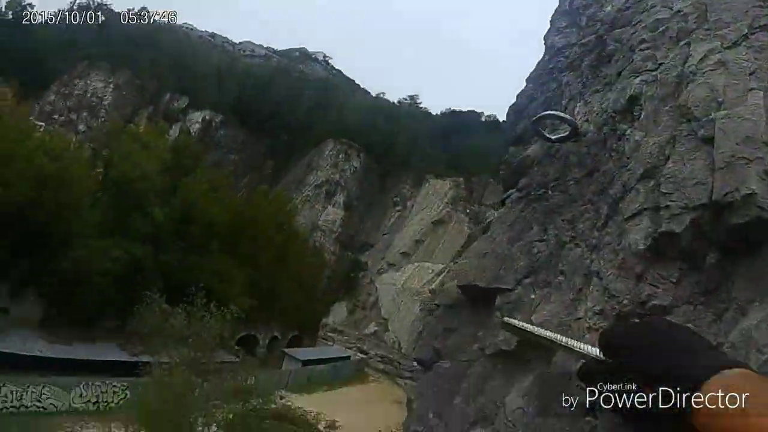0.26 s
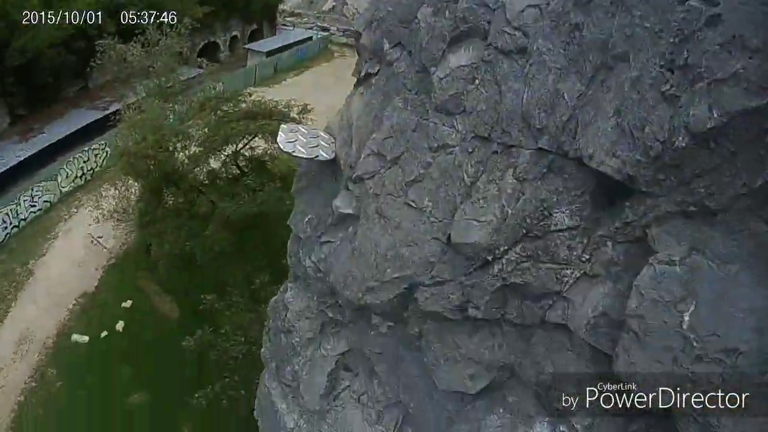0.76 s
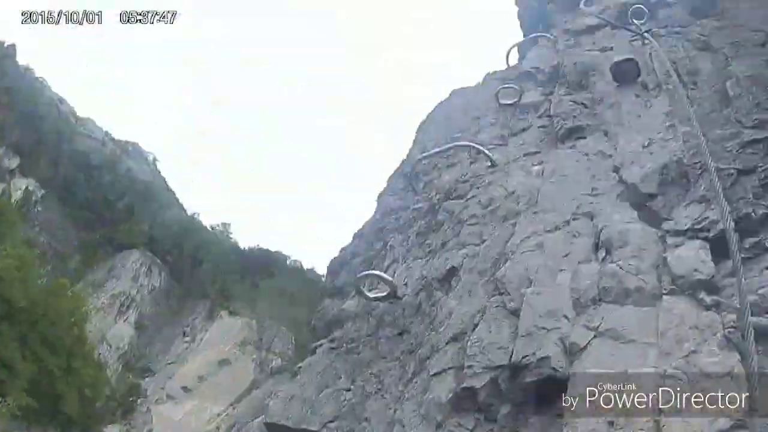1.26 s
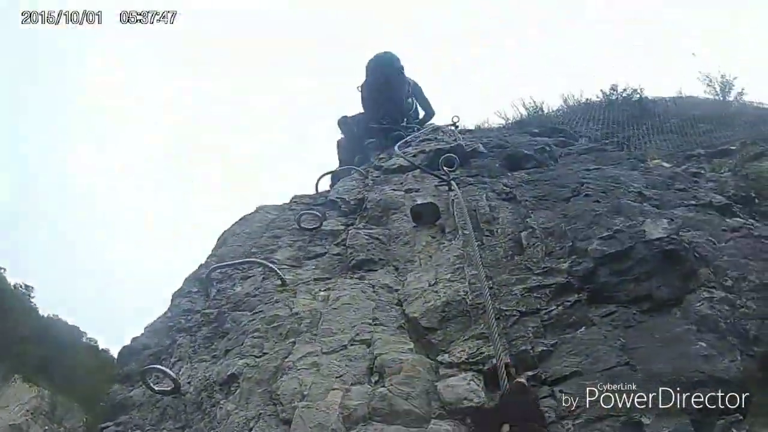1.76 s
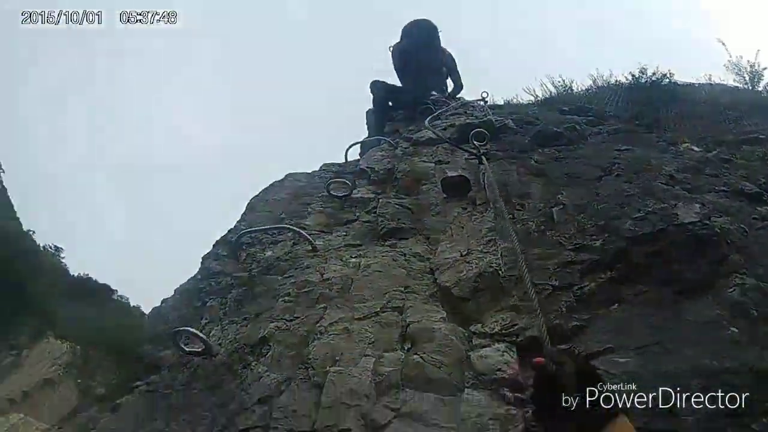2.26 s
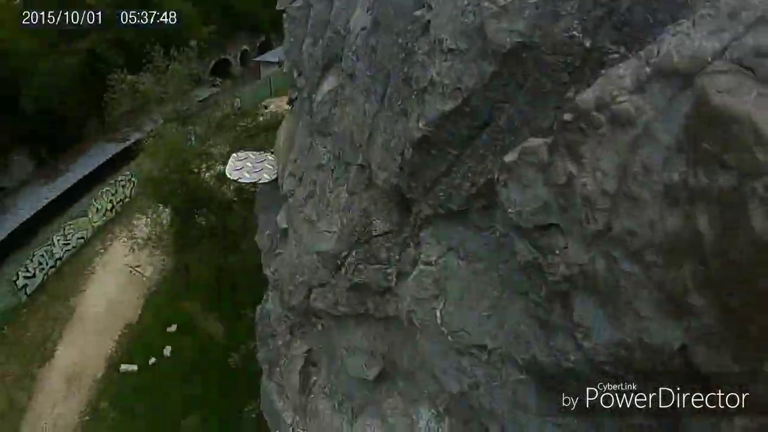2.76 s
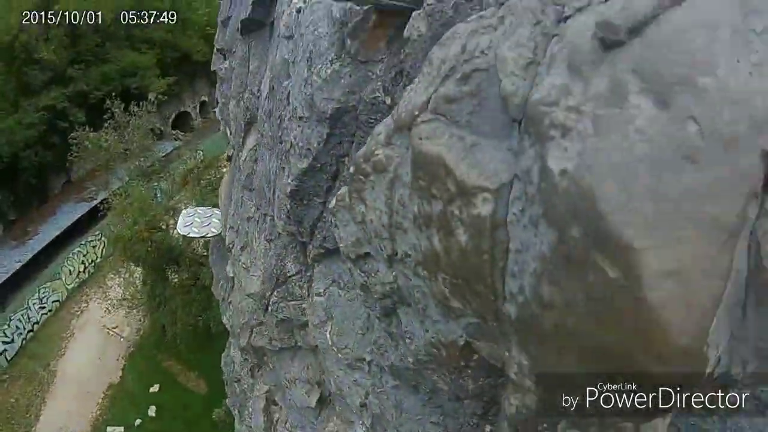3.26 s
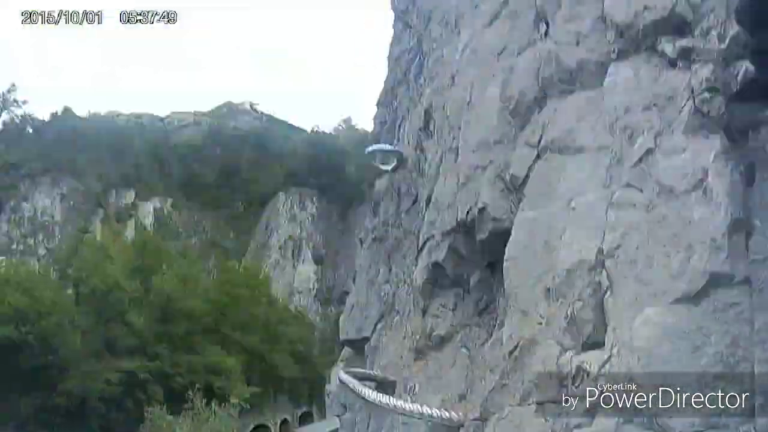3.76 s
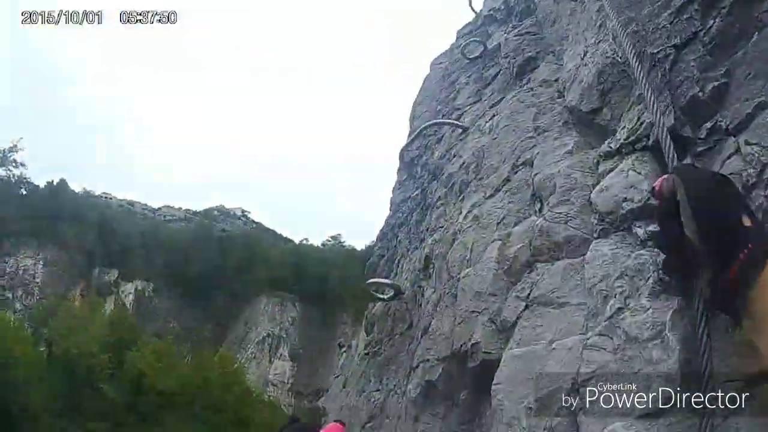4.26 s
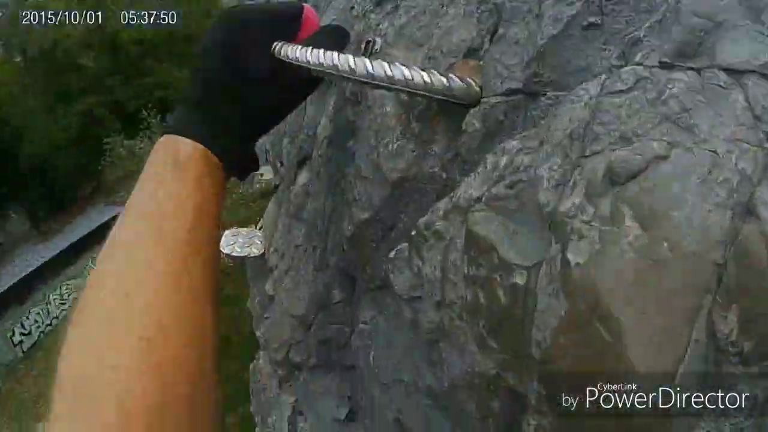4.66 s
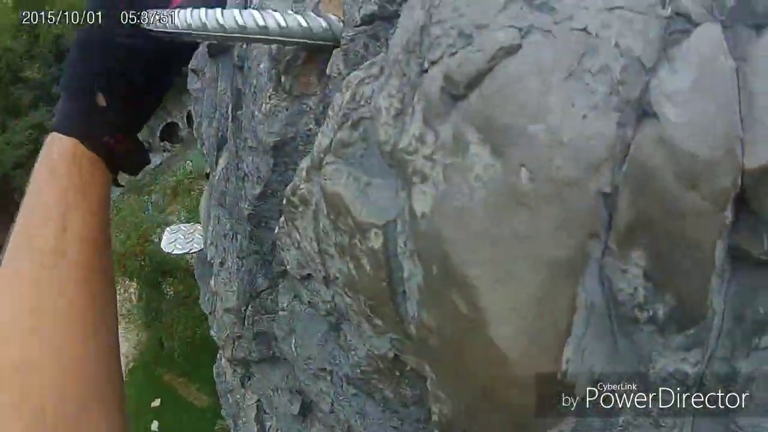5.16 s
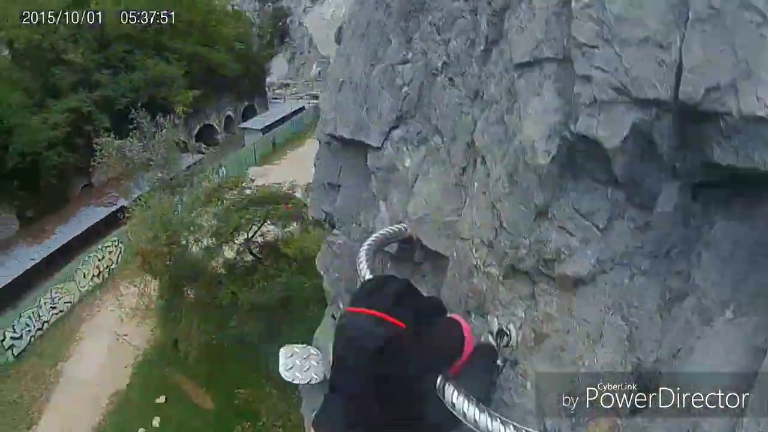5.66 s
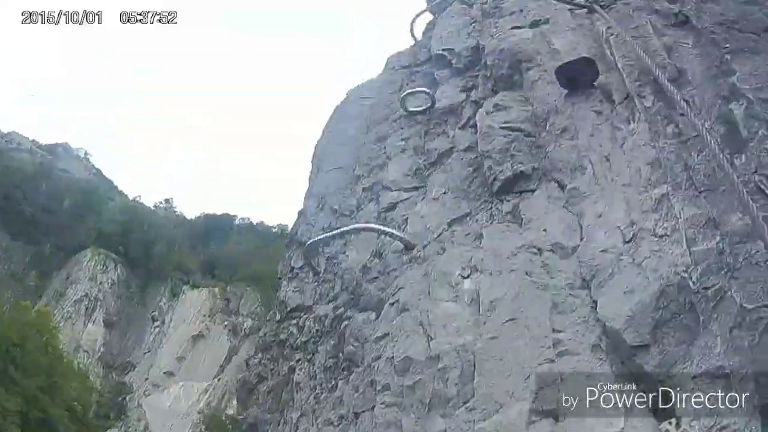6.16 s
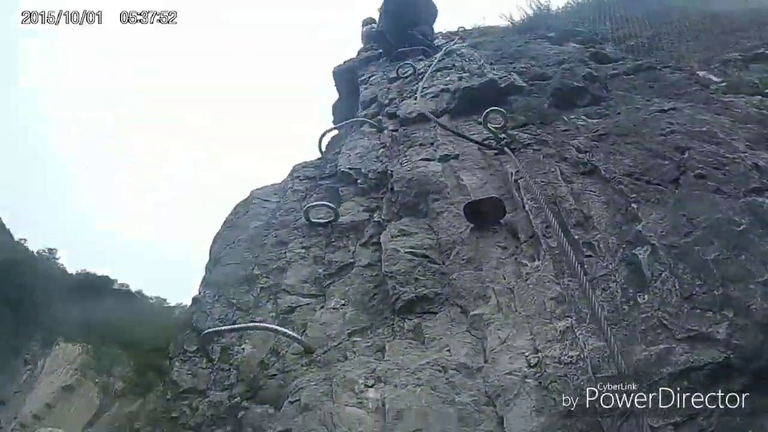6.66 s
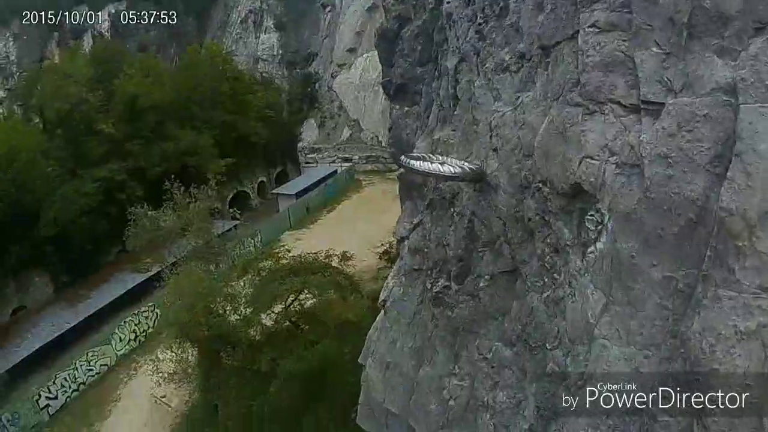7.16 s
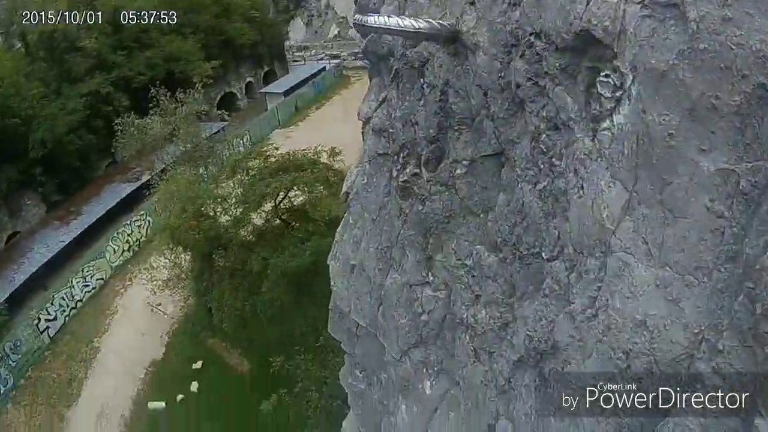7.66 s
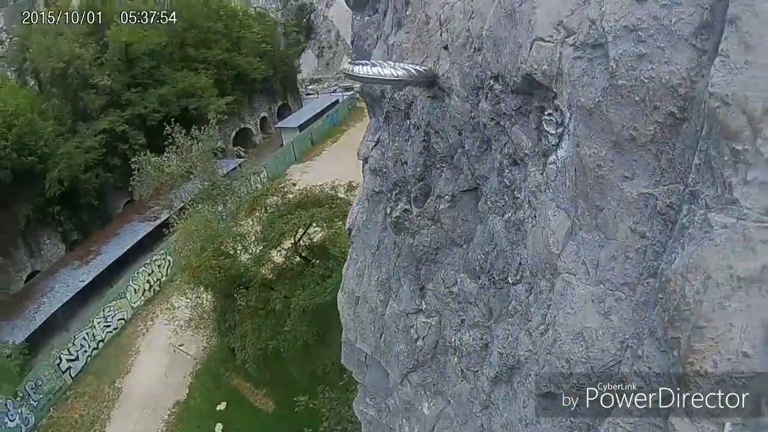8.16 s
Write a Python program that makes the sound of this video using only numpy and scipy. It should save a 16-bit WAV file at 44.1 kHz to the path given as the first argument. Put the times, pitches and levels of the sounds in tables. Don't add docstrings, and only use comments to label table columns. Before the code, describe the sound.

A climber on a cliff with iron rungs, heard by a head-worn microphone inside a sealed shell. Light padded ticks and small metal clinks open the scene over very quiet, steady valley wash and electronic hiss. Soft air pops lead to a gritty rock bump at 1.15 s; straps rub, and the mount snaps hard at 1.6, followed by a clink at 1.75. A firm dull knock lands at 2.2, with faint cricket rasps around 1.9-2.6. The heaviest bump crunches at 3.05, a clink rings at 3.7, then a strap scrape and bright ping precede the hardest snap at 4.2. Knocks follow at 4.4 and 4.7, another bump at 4.97. From 5.5 to 6 low pops cluster with a dull puff and clinking; mount rattles continue. A softer snap at 6.5, sparse knocks, pops near 7.45, faint cricket again, and last ticks around 8.1-8.2.

```python
import sys
import numpy as np
from scipy import signal
from scipy.fft import rfft, irfft, next_fast_len
from scipy.io import wavfile

SR = 44100
rng = np.random.default_rng(int(sys.argv[2]) if len(sys.argv) > 2 else 0)


def unload_audio(sound):
    columns = np.transpose(np.atleast_2d(sound))
    steps = np.round(np.clip(columns, -1, 1) * 32767)
    wavfile.write(sys.argv[1], SR, steps.astype(np.int16))


def gain_from_db(level_db):
    decades = np.asarray(level_db, float) / 20
    return 10 ** decades


N = 371763


def rms_one(x):
    return x / np.sqrt(np.mean(x ** 2) + 1e-30)


def band(x, low_hz, high_hz):
    return signal.sosfilt(signal.butter(2, [low_hz, high_hz], "band", fs=SR, output="sos"), x)


def ring(force, hz, t60_s):
    radius = gain_from_db(-60 / (t60_s * SR))
    angle = 2 * np.pi * hz / SR
    return signal.lfilter([0, np.sin(angle)], [1, -2 * radius * np.cos(angle), radius ** 2], force + 1e-18)


def drift(rate_hz):
    r = np.exp(-2 * np.pi * rate_hz / SR)
    wander = signal.lfilter([1], [1, -2 * r, r * r], rng.standard_normal(N + SR))
    return rms_one(wander[SR:])


def grains(per_s, spread_db):
    sizes = gain_from_db(spread_db * np.minimum(rng.exponential(1, N), 4))
    signs = rng.choice([-1, 1], N)
    return sizes * signs * (rng.random(N) < per_s / SR)


def add(out, start_s, sound):
    i = round(start_s * SR)
    out[i:i + len(sound)] += sound[:N - i]


# (frequency [Hz], density [dB per Hz])
WASH_SPECTRUM = [(12, -30), (20, 1.5), (44, -8.5), (92, -5), (202, -3.5), (274, -3.5), (881, -5),
                 (1270, -7), (1450, -7.5), (4310, -18.5), (5850, -25.5), (8640, -40), (10200, -40.5),
                 (13500, -30.5), (15500, -28.5)]


def valley():
    level_db = -63.5 + 1.0
    size = next_fast_len(N)
    hz = np.fft.rfftfreq(size, 1 / SR) + 1
    points = np.array(WASH_SPECTRUM)
    colour = gain_from_db(np.interp(np.log(hz), np.log(points[:, 0]), points[:, 1]))
    wash = irfft(rfft(rng.standard_normal(size)) * colour, size)[:N]
    return gain_from_db(level_db) * rms_one(wash)


# (time [s], level [dB rms])
RASPS = [
    (1.922, -88),
    (2.119, -89),
    (2.585, -89),
    (6.796, -89),
    (7.063, -90),
    (7.435, -89),
    (7.718, -89),
    (8.07, -89),
]


def cricket():
    t = np.arange(N) / SR
    swell = np.zeros(N)
    for s, level_db in RASPS:
        swell += gain_from_db(level_db) * np.exp(-((t - s) / 0.027) ** 4)
    return swell * rms_one(band(rng.standard_normal(N), 10600, 12300))


# (time [s], level [dB])
EFFORT = [(0, -62), (.56, -68), (.98, -63.5), (1.29, -73.5), (1.66, -60), (1.9, -64.5), (2.6, -77),
          (3.0, -58.5), (3.4, -80), (4.04, -69), (4.19, -56), (4.6, -76), (4.95, -60), (5.6, -80),
          (6.0, -65.5), (7.0, -70.5), (7.3, -61.5), (8.43, -84)]
# (frequency [Hz], width [Hz], level [dB])
STRAP_MODES = [(530, 560, -16), (1168, 143, -1), (1299, 61, 0.5), (1653, 160, -3), (1856, 78, -5.5),
               (2140, 160, -8.5), (2510, 190, -11.5), (3180, 110, -19.5), (4340, 510, -23)]
# (start [s], length [s], strap [dB], mount [dB])
SLIDES = [(1.404, 0.094, -56, -65), (1.521, 0.15, -60, -61.5), (1.647, 0.043, -63, -57.5),
          (1.695, 0.071, -51, -60), (2.732, 0.068, -51.5, -57.5), (2.812, .09, -62.5, -64),
          (2.97, 0.056, -68, -64), (4.094, 0.027, -42.5, -53), (4.12, .04, -40.5, -42.5),
          (4.772, 0.061, -61, -62), (5.892, 0.048, -50, -45.5), (6.354, 0.1, -56.5, -59.5)]
# (start [s], length [s], mount [dB])
MOUNT_SHAKES = [(.23, 0.13, -68), (.65, .04, -64), (4.271, 0.03, -59.5), (5.02, 0.034, -64),
                (5.101, 0.038, -53), (5.146, 0.077, -49), (6.029, 0.031, -48), (6.096, 0.087, -52.5),
                (6.155, 0.034, -47), (7.169, 0.049, -59), (7.365, .03, -62), (7.54, 0.22, -68.5)]
# (start [s], length [s], mount [dB], air [dB])
HEAD_JOLTS = [(.565, .045, -68, -62), (0.771, 0.022, -61, -45), (0.853, 0.035, -63, -51),
              (.98, 0.097, -71.5, -67), (1.117, 0.078, -50.5, -45), (1.635, 0.044, -67.5, -55),
              (3.032, 0.048, -46, -41), (3.102, 0.062, -51, -53), (4.207, 0.059, -49.5, -40),
              (4.934, 0.067, -46.5, -40.5), (5.486, 0.08, -57, -61), (5.829, 0.07, -70, -46),
              (5.945, 0.056, -71, -44), (6.488, 0.065, -61, -47), (7.427, 0.11, -66, -48.5)]


def rubbing():
    sway_mean_db = -68.5
    mount_rest_db, mount_follows = -69.5, 0.8
    air_rest_db, air_follows = -72.5, 0.36
    slide_air_db = -7.5
    shake_strap_db, shake_air_db = -17.5, -16
    jolt_strap_db = -13.5
    t = np.arange(N) / SR
    s, sway_db = np.transpose(EFFORT)
    effort_db = np.interp(t, s, sway_db) - sway_mean_db
    rest_db = np.array([sway_mean_db + effort_db,
                        mount_rest_db + mount_follows * effort_db,
                        air_rest_db + air_follows * effort_db])
    gains = gain_from_db(rest_db - 3.5)

    strokes = [(*row, row[-1] + slide_air_db) for row in SLIDES]
    strokes += [(s, length, db + shake_strap_db, db, db + shake_air_db) for s, length, db in MOUNT_SHAKES]
    strokes += [(s, length, db + jolt_strap_db, db, air_db) for s, length, db, air_db in HEAD_JOLTS]
    for start, length, strap_db, mount_db, air_db in strokes:
        near = slice(int((start - length / 2) * SR), int((start + 1.5 * length) * SR))
        pressure = np.exp(-(2 * (t[near] - start) / length - 1) ** 4)
        gains[:, near] += gain_from_db(np.array([[strap_db], [mount_db], [air_db - 4.5]])) * pressure

    slips = grains(per_s=1600, spread_db=3) * gain_from_db(3 * drift(60))
    strap = np.zeros(N)
    for k, (hz, width_hz, db) in enumerate(STRAP_MODES):
        strap += (-1) ** k * gain_from_db(db) * np.sqrt(width_hz) * ring(slips, hz, 1.6 / width_hz)
    shakes = band(grains(per_s=400, spread_db=2.5), 150, 700)
    mount = ring(shakes, 202.8, 0.098)
    mount -= gain_from_db(-5.0) * ring(shakes, 345, 0.038)
    mount += gain_from_db(-12.5) * ring(shakes, 543, 0.043)
    air = band(rng.standard_normal(N) * gain_from_db(3 * drift(15)), 20, 75)
    return gains[0] * rms_one(strap) + gains[1] * rms_one(mount) + gains[2] * rms_one(air)


# (crest time [s], crest [dB], width [ms])
SQUEEZES = [(0.7917, -36, 1.6), (0.9883, -47, 2.1), (1.1435, -29, 0.91), (1.1461, -26, 1.1),
            (3.0213, -31, 2.5), (3.1549, -27, 1.4), (4.9324, -37, 2.5), (5.519, -32.5, 18),
            (5.564, -25.5, 0.44), (5.5651, -23, 2.9), (5.8917, -25, 5.6), (5.9252, -33, 2.2),
            (5.9337, -21.5, 2.1), (6.4746, -22.5, 1), (6.4791, -28, 0.32), (6.483, -33, 1.1),
            (7.4519, -30.5, 0.59), (7.4627, -30.5, 0.68)]
# (crest time [s], crest [dB], width [ms])
DRAWS = [(0.5805, -46, 7.4), (0.8643, -38.5, 2.5), (1.053, -42, 2.5), (1.145, -30.5, 0.71),
         (1.6078, -30.5, 0.9), (3.148, -31.5, 0.97), (4.232, -40, 2.5), (4.9464, -37, 3.7),
         (5.5089, -35.5, 1.1), (5.5357, -37.7, 12), (5.5696, -25, 0.94), (5.575, -30.5, 2.3),
         (5.8267, -43.5, 4.8), (5.8692, -35, 1.15), (5.8849, -23.5, 2.1), (5.9, -36, 4), (5.929, -28.5, 3),
         (5.9325, -23.5, 0.82), (5.9561, -36, 7.3), (6.4592, -38, 2.1), (7.4707, -27.5, 0.52),
         (7.511, -35.5, 8.7)]
# (lag [s], level re bump [dB], width [ms], push +1 or pull -1 [sign])
BUMP_PRESSURE = [
    (-.011, -9, 18, 1),
    (-.0022, -2, 2.1, -1),
    (.0035, -2.5, .8, -1),
    (.011, -21, 16, 1),
]


def pops():
    settle_s, settle_db, settle_ms = 0.0356, -28.5, 14
    out = np.zeros(N)
    crests = [(*row, 1) for row in SQUEEZES] + [(*row, -1) for row in DRAWS]
    crests += [(*row[:-1], -1) for row in ROCK_BUMPS]
    crests += [(s + lag_s, db + rel_db, ms, way)
               for s, db, *_ in ROCK_BUMPS for lag_s, rel_db, ms, way in BUMP_PRESSURE]
    crests += [(s + settle_s, db + settle_db, settle_ms, 1) for s, db, *_ in MOUNT_SNAPS]
    for s, crest_db, width_ms, way in crests:
        t = np.arange(-3 * width_ms, 6 * width_ms, 1000 / SR) / width_ms
        squeeze = np.exp(-(t / 0.45) ** 2)
        let_go = np.exp(-(np.abs(t) / 0.7) ** 1.5)
        shape = np.where(t < 0, squeeze, let_go)
        add(out, s - 3 * width_ms / 1000, np.sign(way) * gain_from_db(crest_db) * shape)
    return signal.sosfilt(signal.butter(1, 25, "high", fs=SR, output="sos"), out)


# (time [s], pull crest [dB], width [ms], crunch [dB rms])
ROCK_BUMPS = [
    (1.1548, -25, 2.4, -31),
    (3.0495, -22.5, 2.1, -29),
    (4.9732, -23.5, 2, -31.5),
]
# (lag [s], level re crunch [dB], length [s], knee [Hz], fall [dB per octave])
ROCK_GRIT = [
    (-.009, -18, .011, 4200, -25),
    (-.0026, 0, .0022, 4200, -25),
]
# (lag [s], level [dB], length [s], knee [Hz], fall [dB per octave])
SNAP_GRIT = (.028, -49, .019, 4900, -38)
# (time [s], level [dB rms], length [s], knee [Hz], fall [dB per octave])
CLOTH_PUFFS = [
    (4.191, -58, .006, 4500, -40),
    (5.5715, -41, 0.0074, 1300, -18),
    (7.478, -47, 0.017, 1000, -13.5),
    (7.503, -51.5, .016, 4500, -39),
]


def crunches():
    snap_follows = 0.22
    size = 4096
    out = np.zeros(N)
    hz = np.fft.rfftfreq(size, 1 / SR) + 1
    after_s, grit_db, *kind = SNAP_GRIT
    swells = [tuple(row) for row in CLOTH_PUFFS]
    swells += [(s + after_s, snap_follows * db + grit_db, *kind) for s, db, *_ in MOUNT_SNAPS]
    swells += [(s + lag_s, db + rel_db, *rest)
               for s, *_, db in ROCK_BUMPS for lag_s, rel_db, *rest in ROCK_GRIT]
    for s, level_db, length_s, knee_hz, fall_db in sorted(swells):
        slope_db = fall_db * np.log2(np.maximum(hz / knee_hz, 1)) - 3.46 * np.log2(hz / 1000)
        colour = gain_from_db(slope_db) * (hz > 500) * (hz < 12000)
        grit = rms_one(irfft(rfft(rng.standard_normal(size)) * colour))
        swell = np.exp(-((np.arange(size) - size // 2) / SR / length_s * 2) ** 2)
        add(out, s - size // 2 / SR, gain_from_db(level_db) * grit * swell)
    return out


# (time [s], crest [dB], rise [ms], fall [ms], bounce lag [ms])
MOUNT_SNAPS = [
    (1.6173, -8, 0.2, 0.57, 2.3),
    (4.2184, -6, 0.14, 0.49, 1.82),
    (6.4757, -15, 0.13, 0.55, 2.14),
]


def snaps():
    cut_hz, bounce_gain, draw_gain = 3300, 0.13, 0.12
    out = np.zeros(N)
    ms = np.arange(-6, 30, 1000 / SR)
    for s, crest_db, rise_ms, fall_ms, bounce_ms in MOUNT_SNAPS:
        spike = np.exp(-np.abs(ms / np.where(ms < 0, rise_ms, fall_ms)) ** 1.5)
        draw = -draw_gain * np.exp(-((ms + 1.2) / np.where(ms < -1.2, 1.6, 0.5)) ** 2)
        overshoot = -0.3 * np.exp(-((ms - 0.6 * bounce_ms) / (0.4 * bounce_ms)) ** 2)
        bounce = np.roll(spike, round(bounce_ms * SR / 1000))
        rattle = gain_from_db(-49.5) * ring(bounce, 900, 0.023) + gain_from_db(-43) * ring(bounce, 1300, 0.0091)
        snap = spike + draw + overshoot + bounce_gain * bounce + rattle
        add(out, s - 6 / 1000, gain_from_db(crest_db) * snap)
    return signal.sosfilt(signal.butter(2, cut_hz, fs=SR, output="sos"), out)


# (frequency [Hz], t60 [s], contact [s])
SHELL_MODES = [(1667, 0.045, .004), (206.5, 0.067, 0.0027), (1300, 0.052, 0.0044), (2335, 0.029, 0.003),
               (3410, 0.015, 0.003), (4150, 0.012, 0.0013), (1000, 0.09, 0.011), (578, 0.015, 0.01),
               (2050, 0.037, 0.0027), (1728, 0.04, 0.0038), (353, 0.059, 0.0033)]
# (time [s], 1.6 kHz mode [dB], mount re that [dB], 1.3 kHz re that [dB])
PADDED_KNOCKS = [(0.0804, -47, -1, -10), (0.186, -70, 17.5, -4), (0.2334, -73, 17, -5),
                 (0.5715, -67, 19, -6), (0.782, -53.5, 0, 1), (1.3038, -70.5, 14, -10),
                 (2.2369, -27, -12, -9), (2.8081, -41, -6, -6), (3.4454, -66.5, 6.5, 3),
                 (3.7686, -48.5, 2.5, 0.5), (4.1677, -51, 3.5, -2), (4.4427, -36.5, -15, -15),
                 (4.7189, -36, -9.5, -9.5), (4.8456, -47.5, -1.5, -1.5), (5.1711, -49.5, 5.5, -0.5),
                 (5.3537, -60, 11.5, 5), (5.481, -51.5, 4, -1.5), (5.9039, -38.5, -9, -17),
                 (5.9791, -49.5, 3, -2), (6.07, -55.5, 0, 3), (6.1636, -50.5, 3.5, 5.5),
                 (6.1743, -46, -22, -16), (6.3883, -41, -2.5, -16), (6.439, -47, -1.5, -2),
                 (6.694, -60.5, 12.5, -12), (7.23, -38.5, -11.5, -5), (8.1199, -42, -4, 0.5)]
# (time [s], 1.6 kHz mode [dB], mount re that [dB], 1.3 kHz re that [dB], 2.4 kHz re that [dB])
METAL_CLINKS = [(0.31, -63.5, 5, 4, 1), (0.5372, -58.5, -4, 8.5, -8), (0.718, -58.5, -6, 5, -10),
                (1.0039, -62, -7, 9.5, -9), (1.3636, -53.5, -19, 0, -7), (1.4153, -52.5, -22, -16, -10),
                (1.4619, -52.5, -4, 0, -12), (1.7424, -34, -9, -9, -16), (2.016, -46.5, -10.5, -5.5, -8.5),
                (2.36, -55, -7, 0, -3), (2.8705, -51.5, -12, 1, -12), (3.6978, -35.5, -11.5, -5.5, -9),
                (4.0802, -47, -3, 3, -12), (5.912, -36, -10, -2.5, -3), (6.7084, -47, -29, -6, -6.5),
                (6.894, -49.5, -24, 2.5, -11), (8.2097, -38.5, -21, -4.5, -2)]
# (time [s], 1.6 kHz mode [dB], bright edge re that [dB])
RIM_PINGS = [
    (2.712, -67.5, 5),
    (4.087, -42.5, 1.5),
    (4.794, -56.5, 0),
    (7.0772, -66, 4.5),
    (7.743, -74, 13),
]
TOP_MODE_TILT = {"knock": 2, "clink": -6, "ping": 0}


def ticks():
    knock_mid_db, knock_edge_db = -27.5, -29
    clink_edge_re_mid_db = -10
    ping_mount_db, ping_low_db, ping_mid_db = -13, -2, -1
    chatter_span = 2.07
    first_touch = 12.1
    free_s, damp_s, damp_db, damped_above_hz = 0.0042, 0.0009, -9, 1200
    held_db_per_s, press_s = -900, 0.0014
    out = np.zeros(N)
    t = np.arange(SR // 8) / SR
    touches = [(*row, knock_mid_db, knock_edge_db, "knock") for row in PADDED_KNOCKS]
    touches += [(*row, row[-1] + clink_edge_re_mid_db, "clink") for row in METAL_CLINKS]
    touches += [(s, db, ping_mount_db, ping_low_db, ping_mid_db, edge_db, "ping")
                for s, db, edge_db in RIM_PINGS]
    for s, level_db, mount_db, low_db, mid_db, edge_db, kind in sorted(touches):
        chatter = rng.standard_normal((len(SHELL_MODES), len(t)))
        detune = rng.normal(0, 0.012, len(SHELL_MODES))
        shares_db = [0, mount_db, low_db, mid_db, edge_db - 0.5, edge_db + TOP_MODE_TILT[kind],
                     low_db - 14, mount_db - 9.5, mid_db - 6, -6, mount_db - 10]
        for (hz, t60_s, contact_s), share_db, force, off in zip(SHELL_MODES, shares_db, chatter, detune):
            force[0] = first_touch
            drive = band(force * (t < contact_s), hz / chatter_span, hz * chatter_span)
            sound = ring(drive, hz * (1 + off), t60_s)
            if hz > damped_above_hz:
                settling_db = damp_db * np.clip((t - free_s) / damp_s, 0, 1)
                sound *= gain_from_db(settling_db + held_db_per_s * np.maximum(t - free_s, 0))
            sound *= np.sqrt(np.minimum(t / press_s, 1))
            add(out, s - 0.0006, gain_from_db(level_db + share_db + 5) * sound / np.abs(sound).max())
    return out


def scene():
    shell_cut_hz = 6100
    contact = rubbing() + pops() + snaps() + ticks()
    contact = signal.sosfilt(signal.butter(6, shell_cut_hz, fs=SR, output="sos"), contact)
    return (valley() + cricket() + crunches() + contact)[None]


def roll_off(x):
    return signal.sosfilt(signal.butter(12, 15650, fs=SR, output="sos"), x)


def record(dry):
    cutoff_hz = 15800
    mix = signal.sosfilt(signal.cheby2(24, 50, cutoff_hz, fs=SR, output="sos"), dry)
    return roll_off(mix)


dry = scene()
out = record(dry)
unload_audio(out)
```